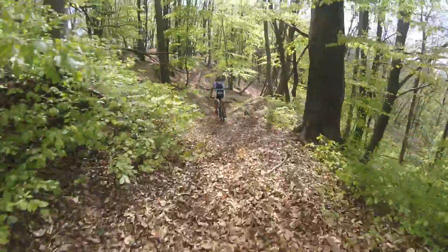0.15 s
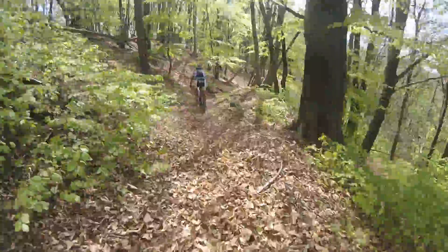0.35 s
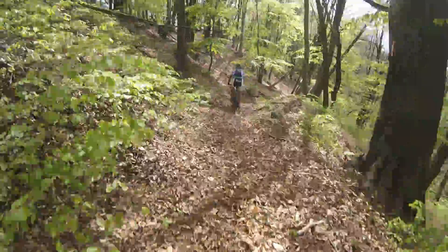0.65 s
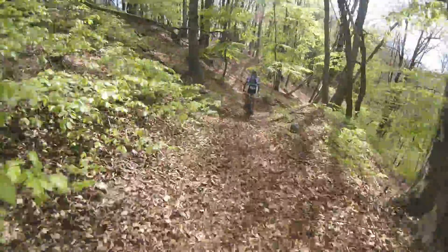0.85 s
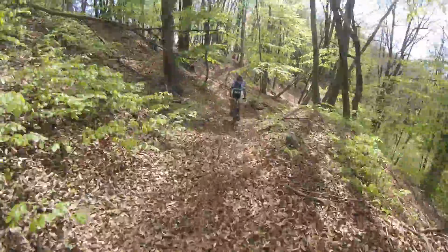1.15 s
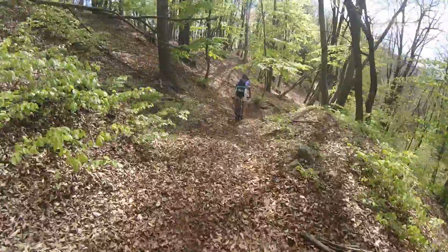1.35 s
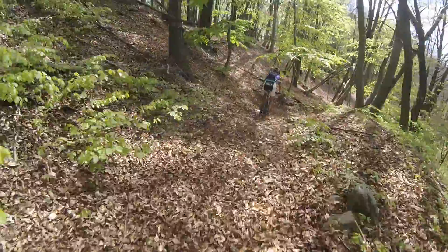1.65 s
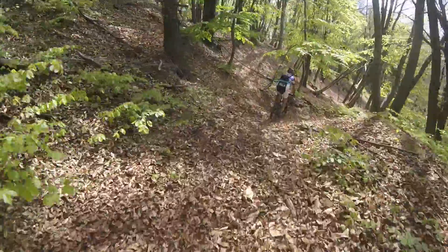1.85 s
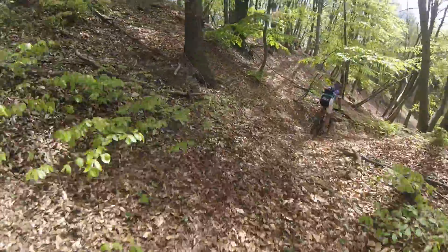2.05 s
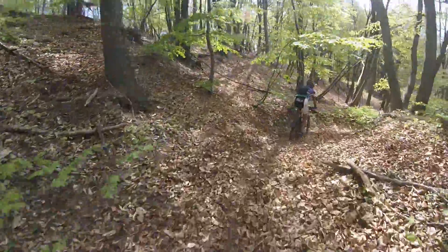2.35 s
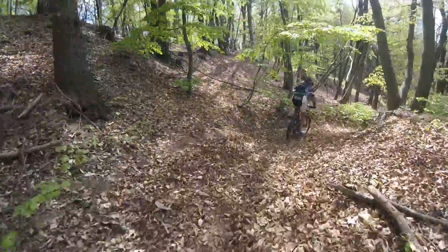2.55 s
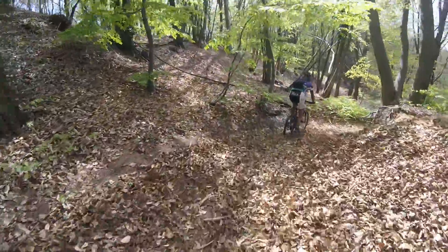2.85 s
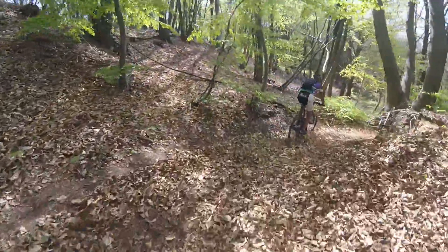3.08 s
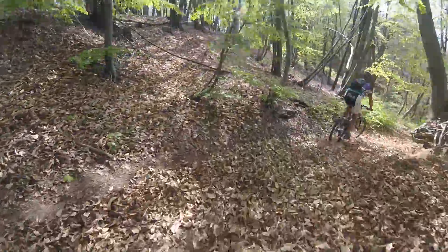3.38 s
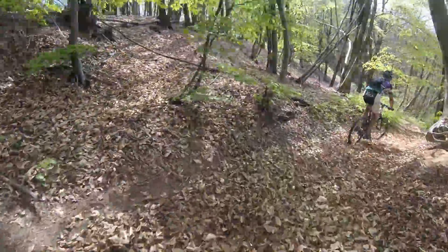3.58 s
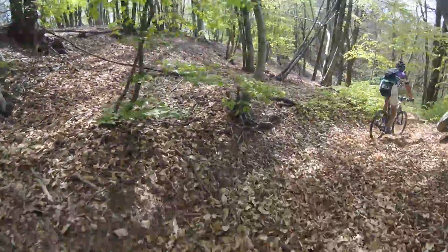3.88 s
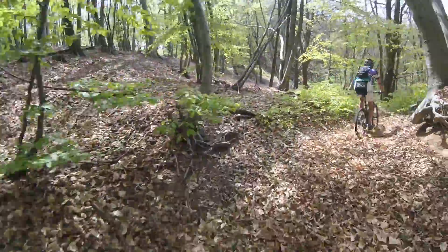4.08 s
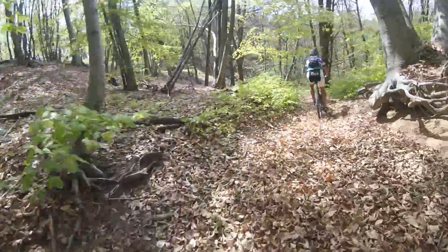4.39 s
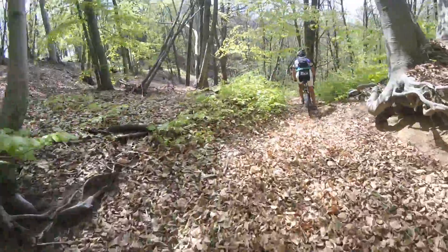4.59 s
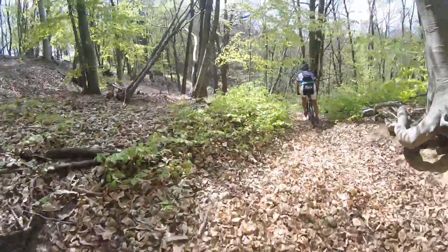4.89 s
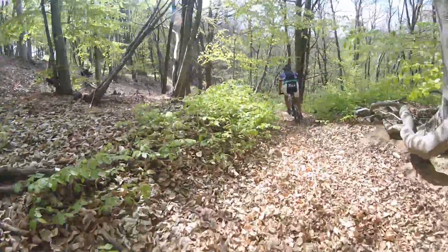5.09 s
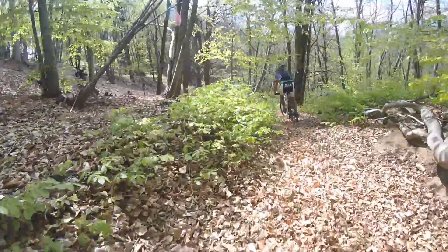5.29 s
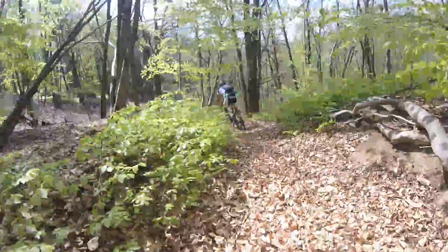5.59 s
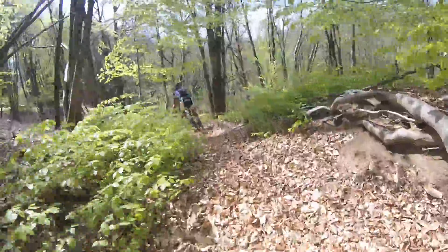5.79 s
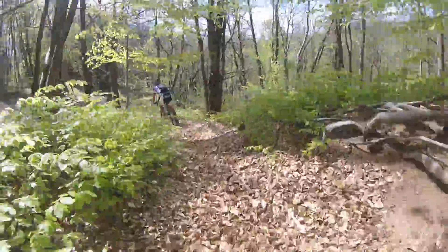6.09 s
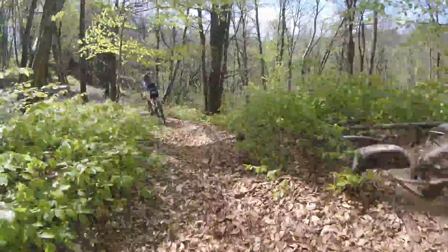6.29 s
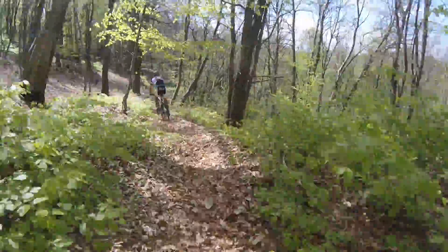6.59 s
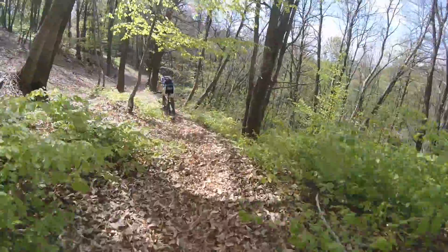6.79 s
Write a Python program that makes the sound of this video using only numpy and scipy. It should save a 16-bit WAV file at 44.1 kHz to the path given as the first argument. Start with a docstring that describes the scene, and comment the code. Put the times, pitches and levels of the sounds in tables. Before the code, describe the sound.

A mountain bike rumbles down a leafy forest trail, hollow thumps and rattles jolting a wind-buffeted onboard microphone as dry leaves crackle under the tyres.

```python
"""A mountain bike rolls down a forest trail of dry leaves, heard from a camera carried along on it.
From the start wind (filtered noise) buffets the microphone, leaves crack (random impacts and hiss), and the
ground drives the ringing modes of mount and frame, while loose parts rattle; roots thump, dips rock the camera.
From about 0.5 s stones scrape, low plants swish, twigs snap and hard parts knock, hardest near 4.1 s.
After about 5 s the wind eases and jolts come less often; thumps return towards the end."""
import sys
import numpy as np
from scipy import signal
from scipy.io import wavfile
from scipy.ndimage import uniform_filter1d, minimum_filter1d

SR = 44100
rng = np.random.default_rng(int(sys.argv[2]) if len(sys.argv) > 2 else 0)


def to_wav(s):
    """Save 16-bit WAV."""
    ch = np.atleast_2d(s).T  # columns
    pcm = np.round(np.clip(ch, -1, 1) * 32767)  # PCM
    wavfile.write(sys.argv[1], SR, pcm.astype(np.int16))


N = 306054
TIME = np.arange(N) / SR


def amp(db):
    """Decibels to gain."""
    return 10 ** (np.asarray(db) / 20)


def unit(x):
    """Scales to rms 1."""
    return x / np.sqrt(np.mean(x ** 2) + 1e-20)


def follow(curve):
    """The value of a (time, value) curve at every sample."""
    return np.interp(TIME, *np.transpose(curve))


def excess(curve, usual_db):
    """How many dB a curve stands above its usual value, at every sample."""
    return follow(curve) - usual_db


def played(x, level_db, span_s):
    """Gives x an rms level, keeping its own flutter that is faster than span_s."""
    power = uniform_filter1d(x ** 2, max(int(span_s * SR), 1))
    return x / np.sqrt(abs(power) + 1e-12) * amp(level_db)


def coloured(x, points):
    """Causal minimum-phase filter with the given spectrum."""
    hz, db = np.transpose(points)
    grid_hz = abs(np.fft.fftfreq(16384, 1 / SR))
    gain_db = np.interp(np.log(grid_hz + 1), np.log(hz), db)
    log_gain = np.log(amp(gain_db))
    taps = np.fft.ifft(np.exp(np.conj(signal.hilbert(log_gain)))).real
    return signal.oaconvolve(x, taps[:len(taps) // 2])[:len(x)]


def ring(x, modes):
    """Passes x through decaying modes; a mode's dB is its share of the energy."""
    t = np.arange(SR // 2) / SR
    response = np.zeros(len(t))
    for k, (hz, width_hz, db) in enumerate(modes):
        decay = np.exp(-np.pi * width_hz * t)
        # alternate signs between neighbouring modes
        response += amp(db) * np.sqrt(width_hz) * decay * np.cos(2 * np.pi * hz * t + np.pi * k)
    return signal.oaconvolve(x, response / np.linalg.norm(response))[:len(x)]


def band(x, low_hz, high_hz, order=2):
    """Butterworth band-pass."""
    return signal.sosfilt(signal.butter(order, [low_hz, high_hz], "band", fs=SR, output="sos"), x)


def impacts(per_s, spread_db):
    """Random tiny impacts, most weak and a few strong."""
    size = amp(spread_db * np.minimum(rng.exponential(1, N), 4.5))
    sign = rng.choice([-1, 1], N)
    strikes = rng.random(N) < per_s / SR
    return unit(size * sign * strikes)


def flutter(hz, depth_db):
    """A gain that wanders at random about hz times a second."""
    knots = rng.standard_normal(N)
    return amp(depth_db * np.interp(TIME * hz, np.arange(N), knots))


def waver(x, hz, depth):
    """Bends all pitches of x by a random share, about hz times a second."""
    drift = np.interp(TIME * hz, np.arange(N), rng.standard_normal(N))
    position = np.arange(N) + np.cumsum(depth * drift)
    return np.interp(position, np.arange(N), x, period=N)


def add(mix, s, sound):
    """Mixes a sound in at time s."""
    part = mix[max(round(s * SR), 0):][:len(sound)]
    part += sound[:len(part)]


STIFFEN, SETTLE_S = 0.45, 0.0093  # sharp share of pitch at hardness 1; time to settle


def swing(hz, length_s, rise_s, t60_s, sharp=0):
    """A mode swells over a cycle or two, settles in pitch, holds while it is pushed, then rings out."""
    t = np.arange(SR // 2) / SR
    turns = hz * (t + sharp * SETTLE_S * (1 - np.exp(-t / SETTLE_S)))
    swell = 1 - np.exp(-(t / rise_s) ** 2)
    decay = amp(-60 * np.maximum(t - length_s, 0) / t60_s)
    return swell * decay * np.sin(2 * np.pi * turns)


def dipped_under(steady, jolts, dip_from_db):
    """The steady shaking dips in level under each big jolt, so the jolt stands out."""
    excess_power = uniform_filter1d(jolts ** 2, SR // 40) / amp(dip_from_db) ** 2
    return steady / np.sqrt(1 + abs(excess_power)) + jolts


def stretch(s, length_s, enter_s, leave_s):
    """A ramp up from 0 to 1 centred on time s, and a ramp down centred length_s later."""
    enter = np.clip(.5 + (TIME - s) / enter_s, 0, 1)
    return enter * np.clip(.5 + (s + length_s - TIME) / leave_s, 0, 1)


# air flow on the microphone, before trim; also rocks the camera: (time [s], level [dB])
WIND = [(0, -29), (0.35, -31), (0.8, -27.5), (0.9, -34), (1.05, -31.5), (1.55, -29), (1.75, -28),
        (2.05, -26), (2.3, -30), (3.15, -30), (3.27, -34), (3.55, -37), (3.98, -33), (4.18, -28.5),
        (4.35, -32), (4.68, -36.5), (4.88, -30.5), (5.15, -29.5), (5.28, -43), (5.95, -37.5), (6.22, -40.5),
        (6.35, -34.5), (6.94, -36)]
USUAL_WIND_DB = -33
# wind spectrum: (frequency [Hz], density [dB per Hz])
WIND_COLOUR = [(10, -26), (22, 3.5), (32, 0.5), (55, -2.5), (100, -10), (160, -10.5), (300, -20.5),
               (600, -33.5), (2000, -65.5)]


def wind(level_db=-29.5, gusts=1.0, lump_db=2.0):
    """Turbulence presses on the microphone in low lumps."""
    air = coloured(rng.standard_normal(N), WIND_COLOUR) * flutter(17, lump_db)
    return played(air, level_db + gusts * excess(WIND, USUAL_WIND_DB), 0.11)


# brushes through loose leaves and low plants: (middle time [s], width [s], level [dB])
SWISHES = [(0.51, 0.06, -47), (4.28, 0.046, -44.5), (5.29, 0.13, -44)]
# swish resonances: (frequency [Hz], width [Hz], level [dB])
SWISH_MODES = [(1030, 84, 0.5), (1260, 210, -6), (1507, 89, -1)]


def swishes(level_db=0):
    """A soft brushing noise swells and fades as the tyres part the leaves."""
    swell = sum(amp(db) * np.exp(-((TIME - s) / width_s) ** 2 / 2) for s, width_s, db in SWISHES)
    brushing = band(ring(rng.standard_normal(N), SWISH_MODES), 850, 1800)
    return swell * played(brushing, level_db, 0.15)


# dips in the trail, before trim: (time [s], peak level [dB], push length [s])
DIPS = [(0.087, -10, 0.065), (0.365, -13.5, 0.063), (0.656, -25, 0.039), (0.782, -11.5, 0.036),
        (1.457, -12, 0.045), (1.71, -13.5, 0.022), (2.026, -12, 0.076), (2.13, -15, 0.047),
        (2.279, -16, 0.033), (2.466, -10, 0.034), (2.639, -17.5, 0.034), (2.855, -11, 0.044),
        (3.28, -22, 0.064), (3.461, -15.5, 0.035), (3.643, -8, 0.014), (3.875, -15.5, 0.036),
        (4.322, -10.5, 0.054), (4.882, -10, 0.037), (4.989, -16, 0.16), (5.922, -14.5, 0.048),
        (6.44, -19, 0.03)]
DIP_RISE_S, DIP_T60_S = .013, .2
# deep rocking of the mount: (frequency [Hz], width [Hz], level [dB])
SWAY_MODE = [(77.1, 4.2, 0)]


def sway(level_db=-32, growth=0.51, dip_db=-5.5, dip_from_db=-25):
    """The camera rocks on its mount in one deep mode: gently with the air flow, hard in each dip."""
    rocks = np.zeros(N)
    for s, db, length_s in DIPS:
        add(rocks, s, amp(db + dip_db) * swing(SWAY_MODE[0][0], length_s, DIP_RISE_S, DIP_T60_S))
    gentle = band(ring(rng.standard_normal(N), SWAY_MODE), 57.0, 96.0)
    gentle = played(gentle, level_db + growth * excess(WIND, USUAL_WIND_DB), 0.3)
    return dipped_under(gentle, rocks, dip_from_db)


# chatter of loose parts, before growth: (time [s], level [dB])
RATTLE = [(0, -49.5), (0.35, -50.5), (0.5, -46), (1.0, -46), (1.22, -48), (1.42, -45), (1.54, -50),
          (1.85, -43.5), (2.05, -44.5), (2.3, -44), (2.9, -41), (3.15, -47), (3.24, -49.5), (3.6, -48.5),
          (3.9, -45), (4.0, -46), (4.28, -41), (4.4, -46.5), (4.6, -40.5), (4.9, -47.5), (5.3, -47.5),
          (5.55, -51.5), (6.1, -50.5), (6.4, -43.5), (6.56, -45.5), (6.7, -41), (6.94, -43)]
USUAL_RATTLE_DB, RATTLES_PER_S = -46, 420
# upper modes of the camera case: (frequency [Hz], width [Hz], level [dB])
CASE = [(862, 150, -12), (1047, 93, -3), (1197, 113, -4.5), (1467, 290, -3)]
# hollow ring of the case, before trim: (time [s], level [dB])
CASE_RING = [(0, -47), (0.1, -44), (0.2, -49.5), (0.43, -45), (0.6, -48), (0.83, -42.5), (0.93, -47),
             (1.01, -38), (1.22, -50.5), (1.35, -44.5), (1.6, -47), (1.86, -37.5), (1.95, -47.5),
             (2.3, -42.5), (2.78, -49.5), (2.93, -35), (3.05, -47), (3.35, -49.5), (3.55, -51.5),
             (3.68, -45), (4.0, -53), (4.12, -29.5), (4.17, -45), (4.35, -43.5), (4.7, -43), (4.95, -49),
             (5.05, -48), (5.2, -54), (5.8, -49.5), (6.1, -61), (6.45, -40.5), (6.55, -47), (6.85, -40.5),
             (6.94, -43)]
# hollow modes of the case: (frequency [Hz], width [Hz], level [dB])
CASE_HOLLOW = [(822, 18.7, -2.5), (850, 25, -3.5), (872, 33, -5)]
# thin buzz of the drivetrain, before trim: (time [s], level [dB])
BUZZ = [(0, -53), (0.9, -49.5), (1.0, -42.5), (1.14, -52), (1.39, -43.5), (1.54, -64), (1.65, -43),
        (1.72, -62), (1.92, -54), (2.0, -37.5), (2.08, -59), (2.3, -47), (2.53, -59), (2.74, -43),
        (2.9, -48), (3.3, -55), (4.1, -50.5), (4.2, -52), (4.3, -41), (4.37, -52), (4.65, -53), (4.85, -71),
        (5.9, -66), (6.45, -50), (6.75, -49.5), (6.94, -44)]
# drivetrain modes: (frequency [Hz], width [Hz], level [dB])
BUZZ_MODES = [(1734, 66, -3), (1823, 51, -4)]


def rattle(level_db=-46, growth=0.91, hollow_db=-1, buzz_db=-2.0, scrub=1.77, unsteady_db=1.7):
    """Chain and cables chatter through the case, which rings hollow in swells; the drivetrain buzzes above."""
    drive = impacts(RATTLES_PER_S, 0.87) + scrub * rng.standard_normal(N)
    drive = drive * flutter(45, unsteady_db)
    chatter = band(waver(ring(drive, CASE), 9, .008), 770, 1900, order=3)
    hollow = band(waver(ring(drive, CASE_HOLLOW), 5, 0.00404), 740, 906)
    buzz = band(waver(ring(drive, BUZZ_MODES), 11, 0.014), 1570, 2070)
    chatter = played(chatter, level_db + growth * excess(RATTLE, USUAL_RATTLE_DB), 0.17)
    hollow = played(hollow, hollow_db + follow(CASE_RING), 0.16)
    return chatter + hollow + played(buzz, buzz_db + follow(BUZZ), 0.13)


# hard parts knock: (time [s], level [dB], blow centre [Hz], dry click relative to level [dB])
KNOCKS = [(0.770, -37, 1000, 10.5), (0.7852, -33, 1110, -2), (1.047, -35.5, 1730, -6),
          (1.4608, -33, 1250, -3), (1.590, -37, 1500, -3), (1.674, -34.5, 950, -10),
          (1.754, -39, 1100, -15), (1.853, -33, 1300, -3), (1.872, -30, 850, -23), (1.962, -26.5, 950, 6),
          (1.970, -36, 950, -18), (2.603, -37, 900, -10), (2.662, -32.5, 990, 1), (2.996, -36, 1500, -8),
          (3.127, -35, 1200, -12), (3.148, -39, 1500, 11), (3.236, -40, 850, -13), (4.0625, -31, 900, -6),
          (4.089, -28, 1500, -16), (4.094, -29, 960, -22), (4.1083, -17, 1500, -30),
          (4.1103, -22, 1140, -30), (4.125, -34, 1500, -20), (4.237, -38, 1100, -10),
          (4.604, -31, 1000, -18), (4.619, -27, 775, -21), (4.749, -36, 1400, -10), (4.758, -38, 480, -20),
          (5.030, -36.5, 900, -5), (5.9535, -34, 1000, -1), (6.458, -30, 920, 5.5), (6.630, -35, 800, -8)]
# knock modes: (frequency [Hz], t60 [s], level [dB])
KNOCK_MODES = [(475, 0.081, 7), (818, 0.037, 0.5), (886, 0.05, -2), (1070, 0.032, -0.5),
               (1140, 0.033, -3.5), (1515, 0.025, -5), (1583, 0.054, -14), (1720, 0.027, -9),
               (2280, 0.009, -7), (2680, 0.011, -12)]


def knocks(level_db=0, octaves=0.52, rise_cycles=1.27, click_decay_s=0.00035):
    """A blow rings most the modes near its centre, each swelling in about a cycle; a dry click adds contact."""
    out, t = np.zeros(N), np.arange(SR // 8) / SR
    for s, db, centre_hz, click_db in KNOCKS:
        knock = np.zeros(len(t))
        for hz, t60_s, mode_db in KNOCK_MODES:
            swell = 1 - np.exp(-(hz * t / rise_cycles) ** 2)
            nearness = 1 / (1 + (np.log2(hz / centre_hz) / octaves) ** 4)
            knock += amp(mode_db - 60 * t / t60_s) * np.sin(2 * np.pi * hz * t) * swell * nearness
        knock = knock / knock[:SR // 200].std()  # level is that of the first 5 ms
        click = band(rng.standard_normal(len(t)) * np.exp(-t / click_decay_s), 1300, 3600, order=3)
        add(out, s, amp(db + level_db) * (knock + amp(click_db) * click / abs(click).max()))
    return out


# twigs snap and grit flicks up, before trim: (time [s], peak level [dB], centre [Hz], width [octaves])
SNAPS = [(0.615, -25, 6400, 0.9), (0.771, -20.5, 5730, 0.9), (0.786, -20.5, 5650, 0.69),
         (0.822, -31, 6800, 0.56), (1.295, -37, 3300, 0.74), (1.494, -23, 6400, 0.64),
         (1.591, -29.5, 6400, 0.35), (1.888, -32, 2550, 0.32), (1.9624, -24, 4670, 1.0),
         (2.2955, -27, 3000, .7), (3.009, -25, 6640, 0.57), (3.1803, -26, 6440, 0.53),
         (3.955, -33, 6400, .6), (4.095, -29, 6760, 0.34), (4.11, -31.5, 2660, 0.18), (4.41, -32, 6200, .6),
         (4.7105, -23, 5260, 0.25), (4.7583, -27.5, 2120, 0.35), (4.944, -33, 6300, .6),
         (5.9985, -20, 5160, 0.7), (6.654, -26.5, 6500, .6)]
# thin treble ring of the case, also set off by leaves: (frequency [Hz], width [Hz], level [dB])
CASE_TREBLE = [(6425, 230, 0)]


def snaps(level_db=3, decay_s=0.0017, splinters=0.1, ring_db=-8):
    """Each snap is a sharp break and milliseconds of splinters that set off the treble ring of the case."""
    out, t = np.zeros(N), np.arange(SR // 20) / SR
    for s, db, hz, octaves in SNAPS:
        burst = splinters * rng.standard_normal(len(t)) * np.exp(-t / decay_s)
        burst[0] = 1  # the break
        reach = 2 ** (octaves / 2)
        crack = band(burst, hz / reach, hz * reach)
        crack = crack + amp(ring_db) * ring(crack, CASE_TREBLE)
        add(out, s, amp(db + level_db) * crack / abs(crack).max())
    return out


# leaf crunch following litter depth, before trim: (time [s], treble level [dB], mids level [dB])
LEAVES = [(0.0, -42, -46.5), (0.07, -47.5, -53), (0.15, -40.5, -47.5), (0.34, -46.5, -52),
          (0.62, -42.5, -50.5), (0.8, -46.5, -52), (0.84, -43.5, -53), (0.87, -51.5, -56.5),
          (1.03, -49.0, -56.0), (1.06, -44.5, -56), (1.12, -48, -55), (1.27, -44.5, -52.5),
          (1.33, -50, -57.5), (1.48, -43.0, -50.5), (1.68, -49.5, -54.5), (1.9, -45, -50),
          (2.13, -45.5, -53.5), (2.17, -38.0, -46.5), (2.5, -40.5, -49.0), (2.74, -46.5, -51.5),
          (3.11, -38.5, -48.0), (3.19, -39.0, -45), (3.2, -46, -56), (3.28, -47.5, -55), (3.32, -42.5, -50),
          (3.44, -48, -54.5), (3.52, -42.5, -50.5), (3.67, -48.5, -56), (3.74, -46.5, -55),
          (3.79, -39, -45.5), (3.91, -44.5, -49), (3.97, -38, -47.5), (4.07, -46.5, -53),
          (4.1, -42.5, -46.5), (4.27, -44.5, -53.5), (4.31, -43.5, -50.5), (4.71, -43.5, -49.5),
          (4.85, -46.5, -55.5), (4.95, -45.5, -54.5), (5.19, -46.5, -52.5), (5.24, -44, -51),
          (5.63, -48.5, -55), (6.14, -41.0, -48), (6.24, -42, -50), (6.63, -41.5, -49), (6.72, -47, -54.5),
          (6.78, -42.5, -52.5), (6.93, -42, -49)]
# leaf spectrum: (frequency [Hz], density [dB per Hz])
LEAF_COLOUR = [(300, -8.5), (900, 4), (1800, 0.5), (2600, 1), (3300, -2.5), (4100, -5), (4900, 1.5),
               (5900, -1), (7000, -1), (8500, -5), (10000, -10.5), (11000, -18), (12000, -28), (14000, -41)]
LEAF_GRAINS_PER_S = 2600


def leaves(treble_db=0.0, mids_db=3.5, hiss=1.0, ring_db=-6, crisp_db=-10, clump_db=1.0, split_hz=4300):
    """Thousands of brittle leaves crack under the tyres, a crunch below a hiss; a few stand out crisply."""
    cracks = impacts(LEAF_GRAINS_PER_S, 2.66) + hiss * rng.standard_normal(N)
    crunch = unit(coloured(cracks * flutter(130, 0.89), LEAF_COLOUR))
    crisp = unit(band(coloured(impacts(220, 1.0), LEAF_COLOUR), 2800, 9000))
    crunch = crunch + amp(crisp_db) * crisp
    crunch = crunch + amp(ring_db) * unit(ring(crunch, CASE_TREBLE))
    mids = signal.sosfiltfilt(signal.butter(6, split_hz, fs=SR, output="sos"), crunch)
    s, treble_curve, mids_curve = np.transpose(LEAVES)
    treble = played(crunch - mids, treble_db + np.interp(TIME, s, treble_curve), 0.11)
    mids = played(mids, mids_db + np.interp(TIME, s, mids_curve), 0.24)
    return (treble + mids) * flutter(35, clump_db)


# ground roughness, before growth; shakes tyres, frame and mount alike: (time [s], level [dB])
GROUND = [(0, -34.5), (0.5, -36.5), (0.72, -32), (0.92, -35.5), (1.55, -35), (1.8, -31), (2.35, -34.5),
          (3.2, -34.5), (3.4, -36), (3.78, -38.5), (4.2, -33), (4.62, -32.5), (4.88, -37.5), (5.15, -34),
          (5.36, -39.5), (5.48, -37), (5.75, -41.5), (6.0, -35.5), (6.12, -39), (6.3, -34), (6.55, -35),
          (6.94, -32.5)]
USUAL_GROUND_DB = -34
# rolling spectrum: (frequency [Hz], density [dB per Hz])
ROLL_COLOUR = [(60, -38.5), (110, -10), (150, -5), (180, 5.5), (210, 2), (300, 2.5), (355, -5), (420, -43),
               (900, -66.5), (4000, -103)]
# hollow ring of tyre and frame: (frequency [Hz], width [Hz], level [dB])
FRAME = [(142.4, 10, -17), (195.8, 3.1, -4.5), (221.9, 3.2, -10.5), (244, 3.7, -5)]
# stones grinding under the tyres: (time [s], level [dB])
GRIND = [(0, -38), (0.3, -46), (0.6, -42), (1.0, -44), (1.6, -42.5), (1.76, -34), (1.88, -38.5),
         (2.1, -40.5), (2.35, -41), (2.5, -46), (2.65, -41), (3.2, -43), (3.3, -47), (3.6, -46), (4.0, -43),
         (4.22, -41.5), (4.5, -42.5), (4.95, -45.5), (5.25, -44.5), (5.4, -44), (5.75, -49.5), (6.1, -48),
         (6.4, -42.5), (6.94, -38.5)]
# grinding spectrum: (frequency [Hz], density [dB per Hz])
GRIND_COLOUR = [(200, -20), (330, 7), (400, -2), (470, -3), (560, -0.5), (670, -15.5), (800, -14),
                (1500, -43), (6000, -88)]
# scrapes over bare soil and stones: (start time [s], length [s], level [dB])
SCRAPES = [(0.555, 0.02, -46), (0.697, 0.05, -42), (1.216, .04, -43), (1.73, 0.05, -45),
           (1.962, 0.016, -28), (2.577, 0.12, -39.5), (3.22, 0.021, -43), (4.054, 0.066, -32.5),
           (4.578, 0.069, -37), (4.764, 0.024, -34), (5.087, 0.045, -41), (5.933, 0.03, -41.5)]
SCRAPE_EDGE_S = 0.011


def tyres(roll_db=-29.0, roll_growth=1.6, hollow_db=5.0, grind_db=0):
    """Knobs drum on the ground and ring the frame; stones grind under them, more in each scrape."""
    roll = unit(coloured(impacts(500, 7.0), ROLL_COLOUR))
    hollow = unit(band(ring(impacts(400, 2.0), FRAME), 122, 270))
    drumming_db = roll_db + roll_growth * excess(GROUND, USUAL_GROUND_DB)
    drumming = played(roll + amp(hollow_db) * hollow, drumming_db, 0.17)
    grind = played(coloured(impacts(1200, 2.3), GRIND_COLOUR), 0, 0.076)
    scrapes = sum(amp(db) * stretch(s, length_s, SCRAPE_EDGE_S, SCRAPE_EDGE_S) for s, length_s, db in SCRAPES)
    return drumming + grind * np.hypot(amp(grind_db + follow(GRIND)), scrapes)


# ring of the mount: (frequency [Hz], width [Hz], level [dB])
MOUNT = [(277.6, 15.5, 2.5), (305.5, 35, -5)]
BUMPS_PER_S = 180


def mount(jolts, level_db=-26.0, growth=1.37, dip_from_db=-23):
    """Small bumps keep the mount booming between the jolts, more so on rough ground."""
    boom = band(ring(impacts(BUMPS_PER_S, 3.23), MOUNT), 245, 358)
    boom = played(boom, level_db + growth * excess(GROUND, USUAL_GROUND_DB), 0.094)
    return dipped_under(boom, jolts, dip_from_db)


# roots and stones jolt mount and frame, before trim:
# (time [s], peak level [dB], ring [Hz], push length [s], hardness [0-1])
THUMPS = [(0.0, -17.5, 256, 0.045, 0.24), (0.243, -18, 290, 0.015, 0.33), (0.612, -21, 275.3, 0.072, 0.3),
          (.693, -13, 282, 0.019, 0.75), (0.805, -11.5, 288, 0.01, 0), (0.86, -17, 290.5, 0.031, 0),
          (0.993, -12, 283, 0.033, 0.1), (1.109, -10, 270.6, 0.025, 0.27), (1.149, -14, 280, 0.057, 0),
          (1.22, -12.5, 272, 0.028, 0.36), (1.37, -13, 278.4, 0.043, 0.43), (1.478, -15, 285, 0.041, 0.13),
          (1.640, -10, 284, 0.0033, 0.37), (1.671, -13.5, 290, 0.0078, 0.4),
          (1.734, -16, 214.7, 0.058, 0.32), (1.749, -20, 312, 0.012, .7), (1.785, -5.5, 259.3, 0.028, 0.24),
          (1.826, -12, 188, 0.022, .1), (1.853, -13, 270, 0.016, 0.2), (1.963, -15.5, 291, 0.0056, 0.9),
          (1.969, -17, 152, 0.021, 0.1), (2.039, -15, 226, 0.029, 0.44), (2.045, -20.5, 191.5, 0.076, 0.2),
          (2.23, -10, 280.3, 0.028, 0), (2.535, -12, 280.5, 0.019, 0), (2.601, -19.5, 292, 0.014, 0.76),
          (2.818, -9, 275.5, 0.029, 0.48), (2.934, -16, 263, 0.012, 0.2), (3.048, -14.5, 264.6, 0.028, 0.7),
          (3.126, -9.5, 270.5, 0.029, 0.5), (3.228, -4.5, 274, 0.015, 0.47), (3.255, -11, 274.7, 0.013, 0),
          (3.297, -22, 285, 0.023, 0.2), (3.864, -18, 282, 0.052, 0), (3.949, -13, 278, 0.019, 0.25),
          (4.101, -12, 267, 0.014, 0.75), (4.168, -19, 163, 0.032, 0), (4.195, -14, 283, 0.025, 0.3),
          (4.261, -7.5, 270, 0.0097, 0), (4.287, -11, 250, 0.0055, 0), (4.305, -5, 246, 0.012, 0.26),
          (4.420, -14, 258, 0.008, 0.1), (4.436, -8.5, 249, 0.016, 0.52), (4.475, -13.5, 259, 0.01, 0.1),
          (4.562, -7.5, 248, 0.011, 0.3), (4.615, -6.5, 288.5, 0.012, 0.4), (4.654, -10, 267, 0.012, 0),
          (4.756, -16, 171, 0.0094, .8), (4.760, -4, 278, 0.011, 0.14), (4.902, -18.5, 268, 0.025, 0),
          (4.905, -25, 147, 0.028, 0.2), (5.024, -9, 265, 0.0056, 0.06), (5.102, -23, 280, 0.007, 0.7),
          (5.115, -22, 180, 0.067, 0.1), (5.15, -17, 283, 0.033, 0), (5.933, -12, 292, 0.016, 0.2),
          (5.95, -18, 200, 0.021, 0.1), (5.978, -18.5, 279, 0.038, 0.4), (6.575, -11.5, 241, 0.0081, 0.04),
          (6.672, -12.5, 272.3, 0.015, 0), (6.797, -11, 282, 0.065, 0.04), (6.876, -9, 279, 0.016, 0.03)]
THUMP_RISE_S, THUMP_T60_S = .007, .08  # rise at hardness 0


def thumps(level_db=-2.5, unsteady_db=0.7):
    """Each root or stone rings the mount or frame; a hard one starts faster and stiffens it for a moment."""
    out = np.zeros(N)
    for s, db, hz, length_s, hard in THUMPS:
        rise_s = THUMP_RISE_S / (1 + hard)
        thump = swing(hz, length_s + rise_s / 2, rise_s, THUMP_T60_S, STIFFEN * hard)
        add(out, s - rise_s / 2, amp(db + level_db) * thump)
    return out * flutter(90, unsteady_db)


def scene():
    """Everything arrives at one microphone, with no room around it."""
    background = wind() + swishes() + sway()
    bike = rattle() + knocks() + tyres() + mount(thumps())
    return (background + bike + snaps() + leaves())[None]


EDGE_HZ = 13900


def record(dry):
    """A limiter eases the gain down around the largest peaks; then a low-pass sets the band limit."""
    ceiling, size = .52, SR // 80  # full scale = 1; window in samples
    gain = minimum_filter1d(ceiling / np.maximum(abs(dry), ceiling), size)
    gain = uniform_filter1d(gain, size)
    low_pass = signal.firwin(511, EDGE_HZ, window=("kaiser", 9), fs=SR)
    return signal.oaconvolve(dry * gain, low_pass[None], "same")


dry = scene()
out = record(dry)
to_wav(out)
```